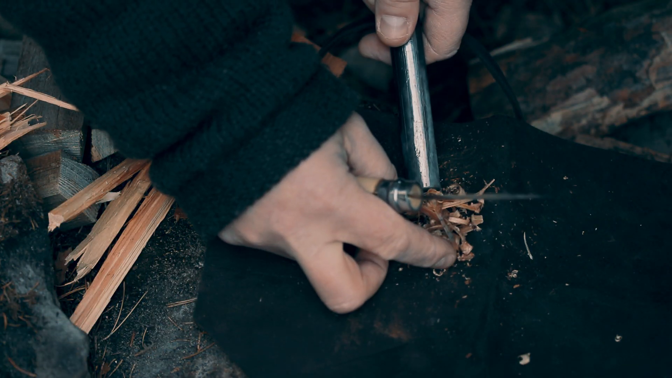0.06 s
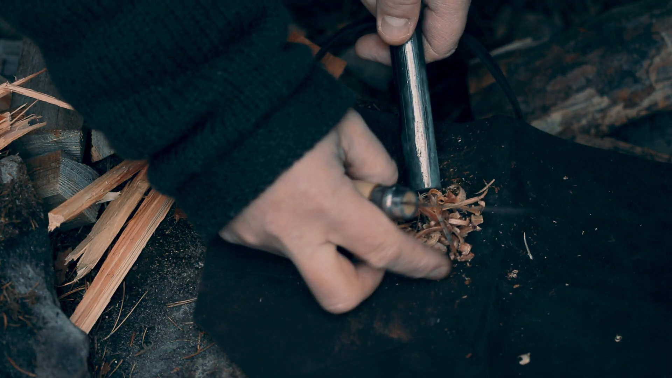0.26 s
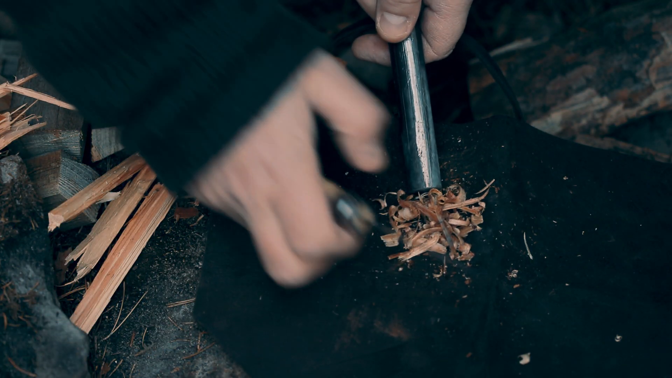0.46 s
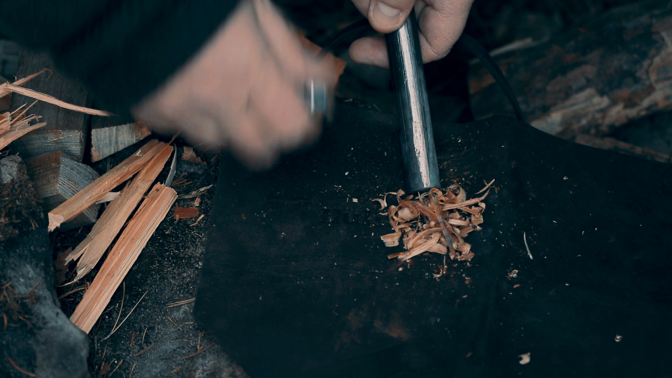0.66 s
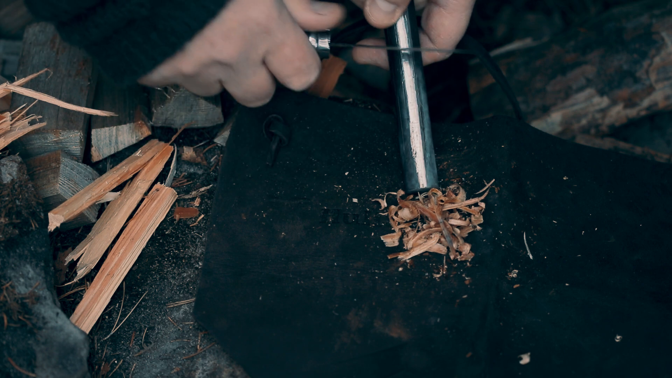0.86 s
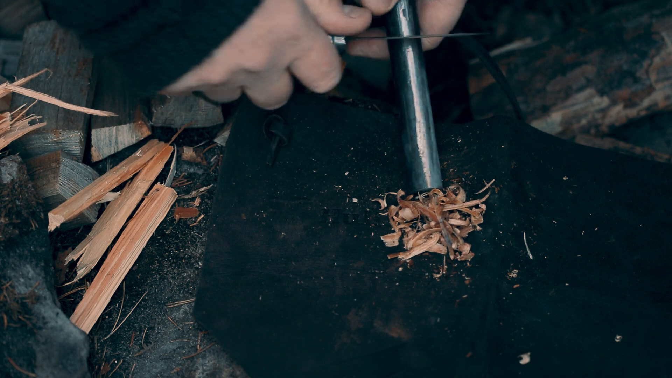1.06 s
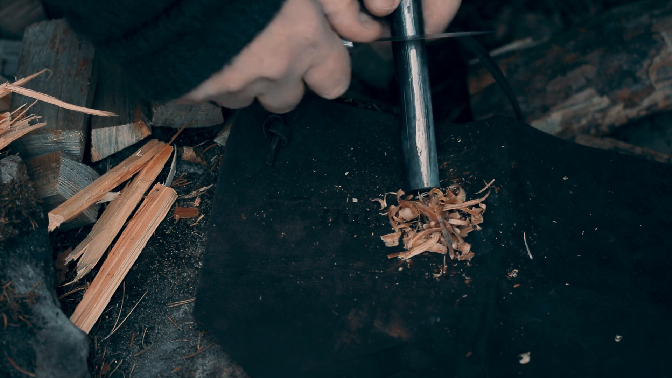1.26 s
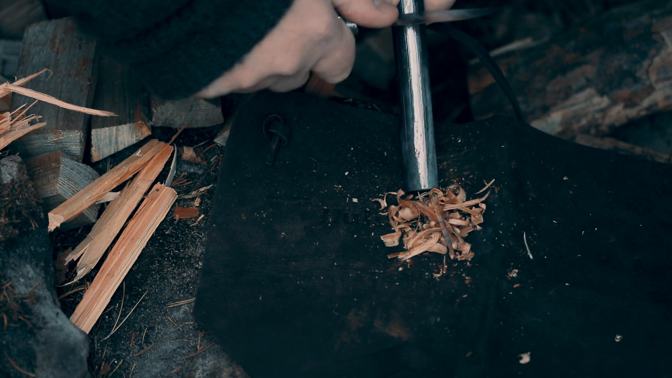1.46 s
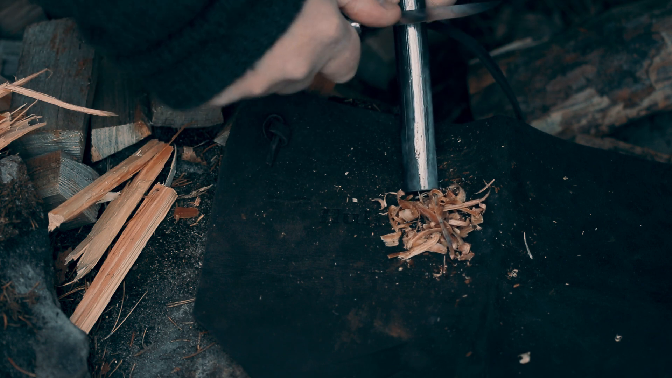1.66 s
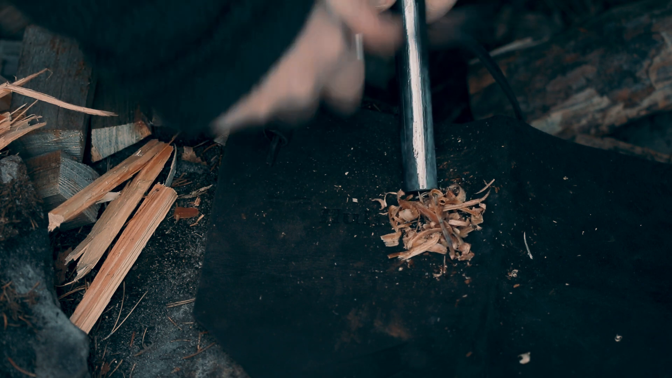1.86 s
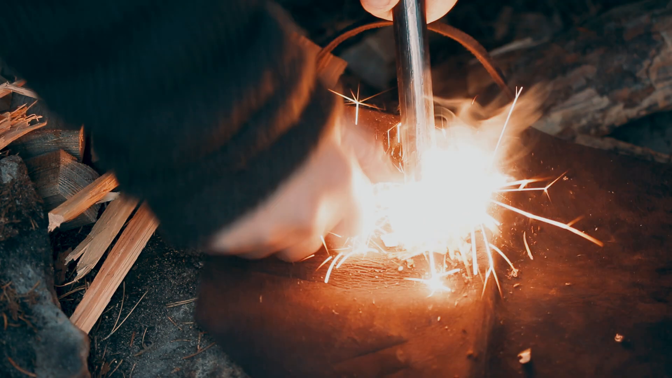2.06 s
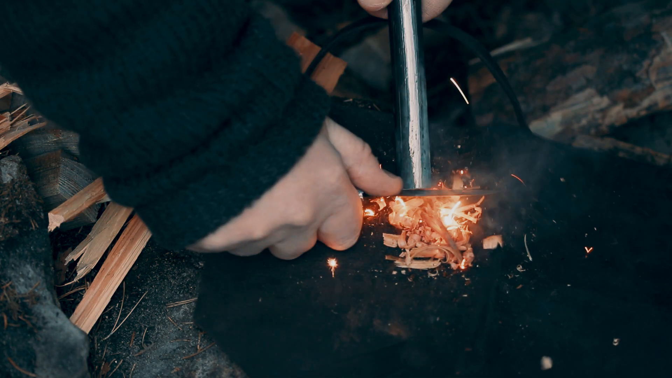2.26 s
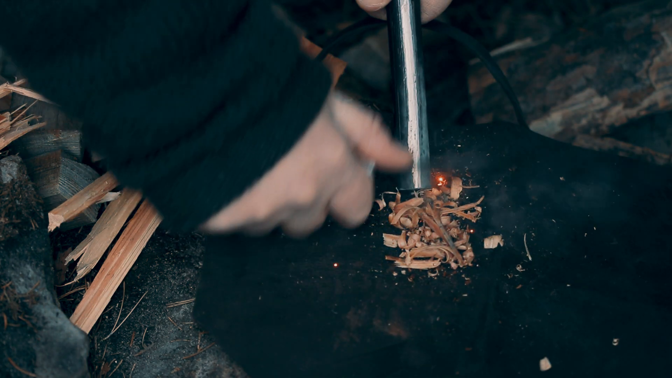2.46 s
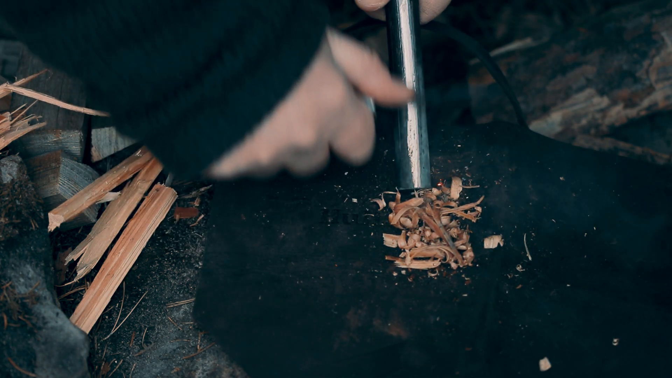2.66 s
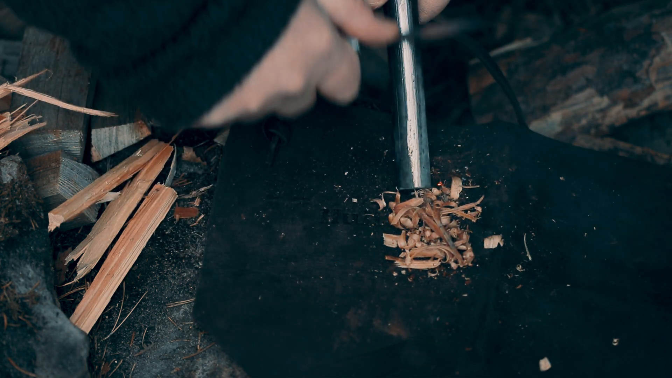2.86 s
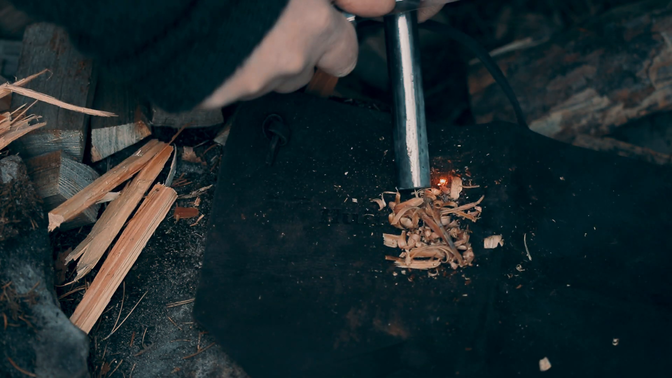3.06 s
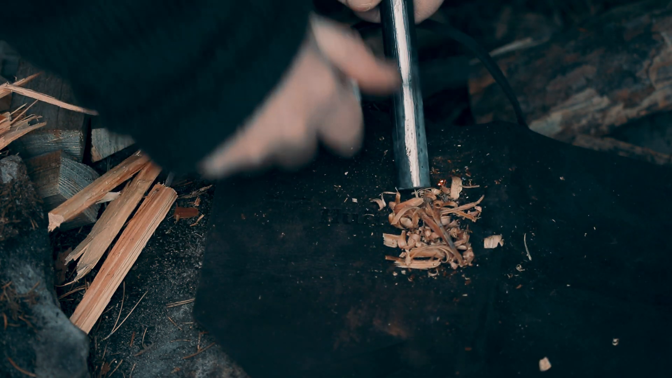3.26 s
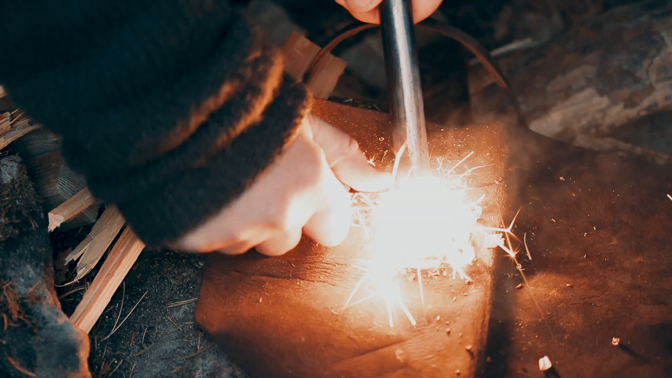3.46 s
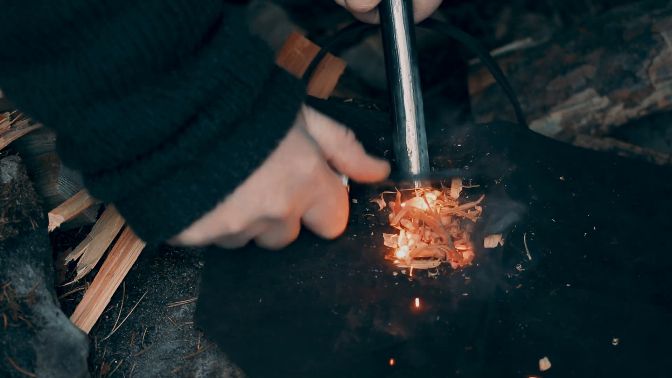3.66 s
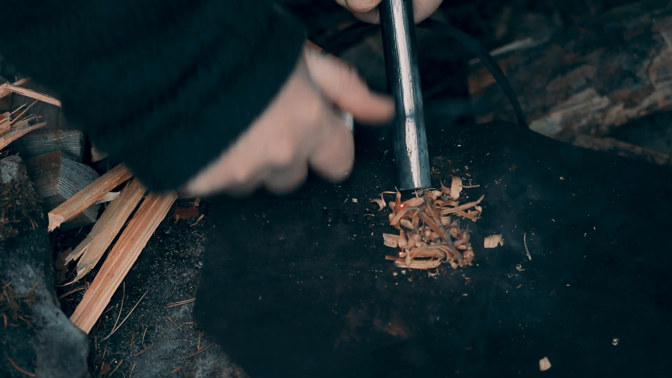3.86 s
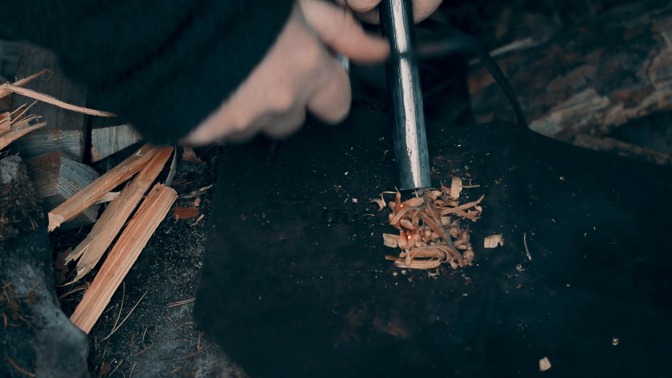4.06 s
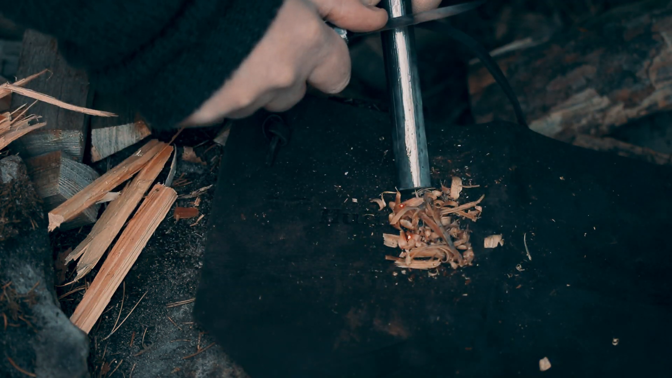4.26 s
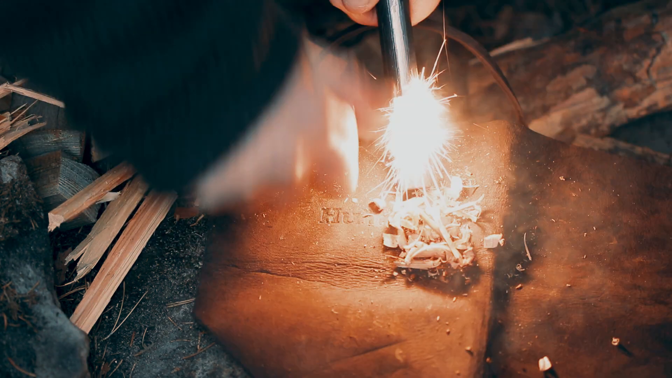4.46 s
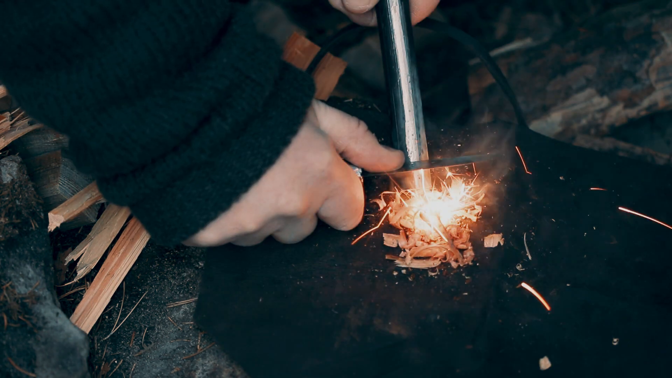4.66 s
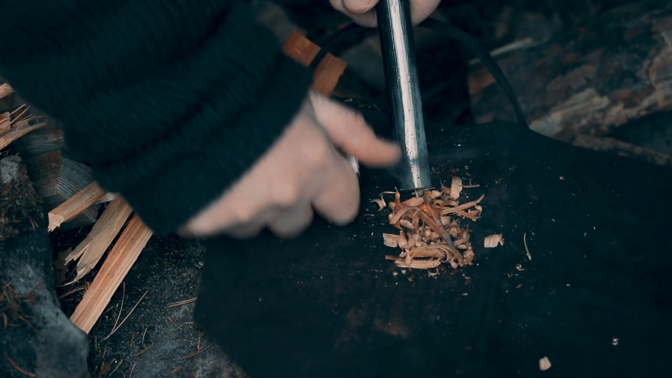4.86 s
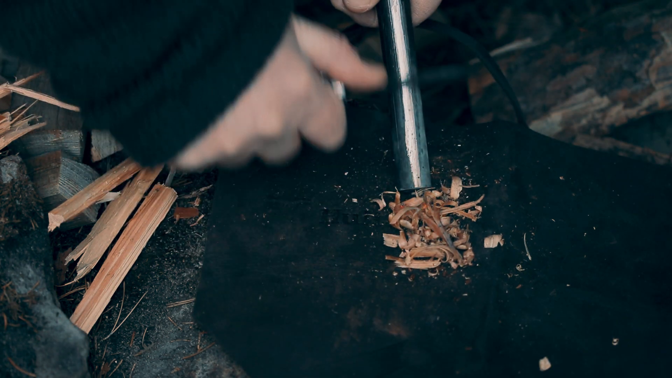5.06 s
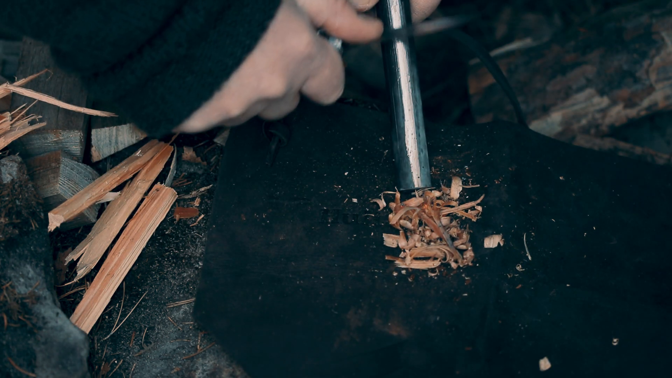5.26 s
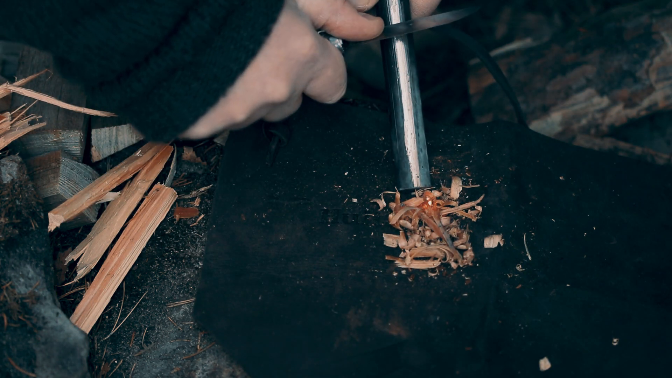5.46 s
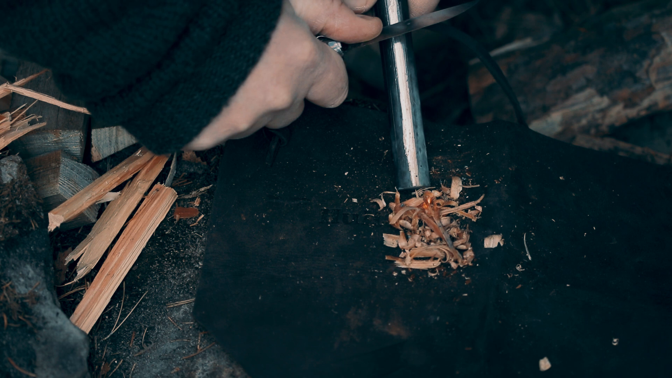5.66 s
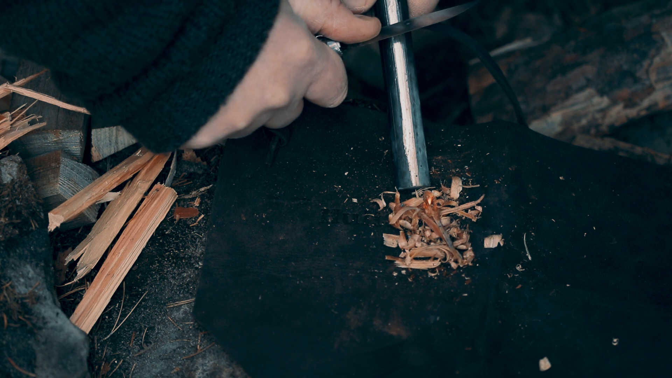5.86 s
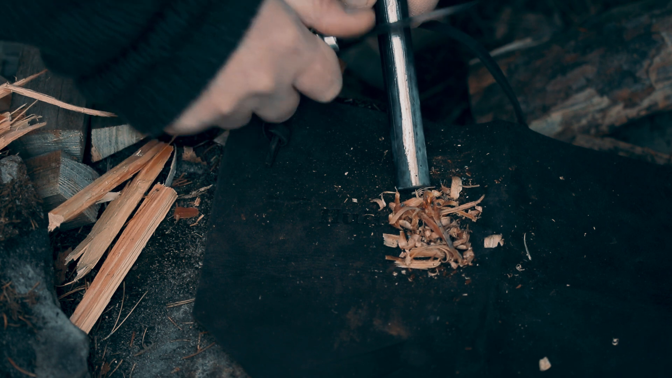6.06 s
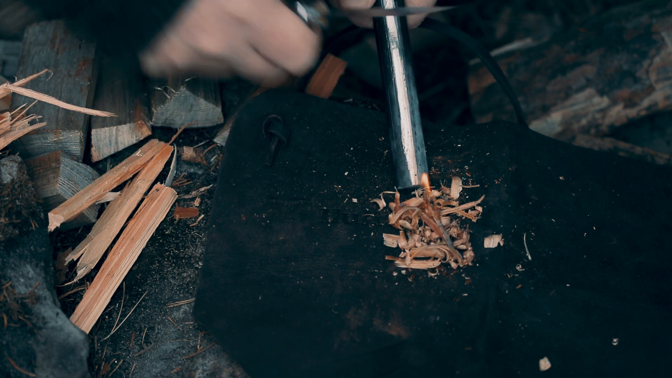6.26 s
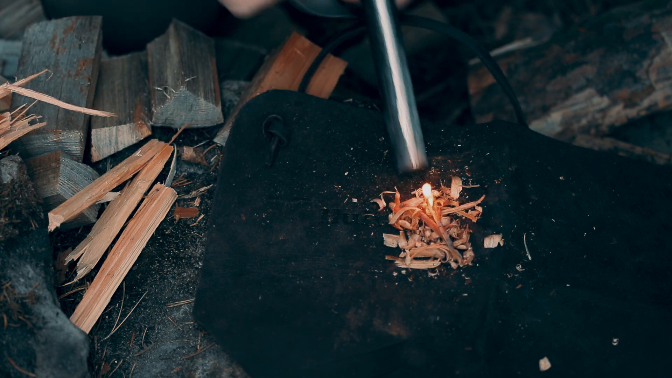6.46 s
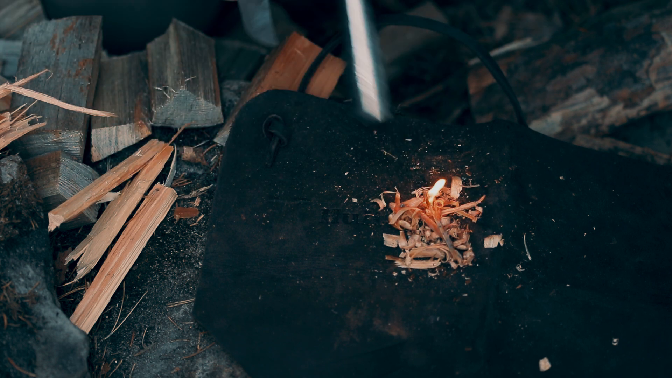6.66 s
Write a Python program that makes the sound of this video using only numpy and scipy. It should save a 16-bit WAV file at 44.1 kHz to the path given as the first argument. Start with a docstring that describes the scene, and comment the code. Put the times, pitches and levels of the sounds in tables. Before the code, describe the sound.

Close, dry outdoor sound of a striker on a fire-starting rod. Soft woollen sleeve rustle and a light tap come first, then a short thin squeak. Three gritty, bright scrapes follow, each swelling into a hissing tear with crackling sparks; the first ends in a hard steel knock. Chattering squeaks follow the second and third strokes, then near-quiet rustling and a few faint scratches over still air.

```python
"""A steel striker is dragged down a thick ferro rod three times over wood shavings at a quiet camp.
The edge grinds: random grains of noise hiss, ring rod and blade, and grind into the ground.
It squeaks (wavering tones and overtones) as it slides back up, and taps the rod (short fading tones).
Sparks and shavings snap in bursts of grains; woollen sleeves rustle as filtered noise over still air."""
import sys
import numpy as np
from scipy import signal
from scipy.fft import rfft, irfft, next_fast_len
from scipy.io import wavfile
from scipy.ndimage import uniform_filter1d

SR = 44100
rng = np.random.default_rng(int(sys.argv[2]) if len(sys.argv) > 2 else 0)


def dump(signal):
    """Clip the signal to [-1, 1] and save it as 16-bit WAV at the path in sys.argv[1]."""
    limited = np.clip(np.atleast_2d(signal).T, -1, 1)
    pcm = np.round(limited * 32767).astype(np.int16)
    wavfile.write(sys.argv[1], SR, pcm)


N = 296101  # length in samples

# tone of the grinding into the ground: f/Hz, relative level per Hz/dB
GRIND = [(70, -30), (130, -21.5), (330, -11.5), (520, -6.5), (700, -2.5), (900, 2), (1080, -7.5),
         (1250, -10), (1600, -13.5), (2500, -84)]
# tone of sparks and sharp cracks: f/Hz, relative level per Hz/dB
SPARK = [(710, -29), (1200, -35), (1770, 1), (3300, 0), (3600, 6.5), (5130, -4.5), (5650, 1.5),
         (8880, -4.5), (15700, -28)]
SPLIT_HZ = 6000  # rasp below, fizz above
DUG_IN = 0.088  # power share that rings the rod once the edge has dug in, 0-1
SLIDE_SHARE = 0.61  # the same share under a light touch, 0-1


def amp(db):
    """Turns decibels into a plain multiplier."""
    return 10 ** (np.asarray(db) / 20)


def evened(x):
    """Scales a sound to an average strength (rms) of 1."""
    return x / np.sqrt(np.mean(x ** 2) + 1e-20)


def colour(x, points):
    """Filters by a spectrum joined on a log-frequency axis, to rms 1."""
    f, db = np.transpose(points)
    size = next_fast_len(len(x))
    hz = np.fft.rfftfreq(size, 1 / SR)
    gain = amp(np.interp(np.log(hz + 1), np.log(f + 1), db, -90, -90))
    return evened(irfft(rfft(x, size) * gain, size)[:len(x)])


def add(mix, s, sound):
    """Adds a sound into the mix from time s on, cut off at the end of the mix."""
    part = mix[round(s * SR):][:len(sound)]
    part += sound[:len(part)]


def resonate(x, hz, width):
    """Shifts the curve hz down to zero, smooths, and shifts back: a resonance of gain 1."""
    turn = np.exp(2j * np.pi * np.cumsum(hz * np.ones(len(x))) / SR)
    r = np.exp(-np.pi * width / SR)
    return 2 * (turn * signal.lfilter([1 - r], [1, -r], x / turn)).real


def wander(count, per_s):
    """Smooth chance of rms 1 that changes about per_s times a second."""
    span = max(round(SR / per_s), 1)
    noise = rng.standard_normal(count + 4 * span)
    smooth = uniform_filter1d(uniform_filter1d(noise, span), span)
    return evened(smooth[2 * span:][:count])


def grains(count, per_s, spread_db):
    """Random tiny impacts over a bed of noise; a few are large."""
    size = amp(spread_db * np.minimum(rng.exponential(1, count), 5)) * rng.standard_normal(count)
    hits = size * (rng.random(count) < per_s / SR)
    return evened(hits + 0.26 * rng.standard_normal(count))


def halves(x):
    """Parts below and above SPLIT_HZ, each of rms 1."""
    low = signal.oaconvolve(x, signal.firwin(31, SPLIT_HZ, fs=SR), "same")
    return evened(low), evened(x - low)


def patchy(x, patch_db):
    """Random clumps in time and pitch: each grain has its own tone."""
    z = signal.stft(x, nperseg=128)[2]
    across_pitch = uniform_filter1d(rng.standard_normal(z.shape), size=2, axis=0)
    clumps = evened(uniform_filter1d(across_pitch, size=7, axis=1))
    return evened(signal.istft(z * amp(patch_db * clumps), nperseg=128)[1][:len(x)])


def columns(rows, lap=0.002):
    """Curves at the sample rate, with a soft start and a short soft overhang at the end."""
    s, *values = np.transpose(rows)
    t = np.arange(s[0], s[-1] + lap, 1 / SR)
    fade = np.sqrt(np.clip(np.minimum(t - s[0], t[-1] - t) / lap, 0, 1))
    curves = [uniform_filter1d(np.interp(t, s, v), size=90, mode="nearest") for v in values]
    return s[0], fade, curves


def air():
    """Still outdoor air: filtered noise, drifting a little."""
    # tone of the air: f/Hz, relative level per Hz/dB
    air_tone = [(12, -52.5), (20, -15), (65, -13.5), (130, -11.5), (186, -12), (233, -8.5), (407, -3.5),
                (618, -6.5), (993, -8), (1640, -21), (8270, -22.5), (12200, -22), (15700, -23.5)]
    level_db = -71.5 + 0.99 * wander(N, 7.1)
    return amp(level_db) * colour(rng.standard_normal(N), air_tone)


def sleeves():
    """Wool fibres rub as the arms move: many small grains that swell and sink."""
    # how strongly the sleeves rub, before a small random waver: t/s, level/dB
    rubbing = [(0.0, -76.5), (0.358, -74), (0.48, -67), (0.64, -63), (0.84, -69), (1.338, -67),
               (1.476, -72.5), (1.714, -67), (4.06, -65), (4.36, -71.5), (5.122, -63), (5.24, -68),
               (5.776, -77), (6.05, -72), (6.296, -68), (6.426, -66), (6.71, -65)]
    # tone of the wool: f/Hz, relative level per Hz/dB
    wool = [(530, -36), (900, -5.5), (1120, -9), (1350, -3.5), (1490, -6.5), (1740, -4.5), (2130, -6.5),
            (7480, -8), (15700, -28.5)]
    s, db = np.transpose(rubbing)
    level_db = np.interp(np.arange(N) / SR, s, db) + 1.0 * wander(N, 37.4)
    return amp(level_db) * colour(grains(N, 5000, 0.54), wool)


def snap(s, db, hz, bass_db, treble_db, t60):
    """A spark or shaving snaps: a burst of grains, partly tuned, with a dull push under it."""
    t = np.arange(SR // 8) / SR
    grit = grains(len(t), 4000, 2.5)
    grit[12] += 4.0  # a strong early break
    rasp, fizz = halves(colour(grit, SPARK))
    tuned = evened(resonate(grit, hz, 180))
    crack = 0.1 * rasp + 0.5 * amp(treble_db) * fizz + 0.14 * tuned
    push = 0.5 * amp(bass_db) * colour(grit, GRIND)
    fall = amp(db - 60 * t / max(t60, 0.002))
    return s, fall * np.minimum(t / 0.00042, 1) * (crack + push)


def tap(s, db, tune, damp, crack_db, thud_db, thud_hz):
    """Steel meets rod: a crack, the short ring of the steel, and a thud where the rod stands."""
    # tones of the steel at tuning and damping factor 1: f/Hz, relative level/dB, time to fade 60 dB/s
    steel = [(1530, -5.5, 0.043), (3030, -8.5, 0.027), (3550, -7, 0.044), (4100, -28, .02),
             (5120, -1, 0.014), (6410, -7.5, 0.035)]
    t = np.arange(SR // 8) / SR
    ring = sum(amp(d - 60 * damp * t / t60) * np.sin(2 * np.pi * hz * tune * t) for hz, d, t60 in steel)
    crack = colour(rng.standard_normal(len(t)), SPARK) * amp(crack_db - 60 * t / 0.028)
    thud = amp(thud_db - 60 * t / 0.059) * np.sin(2 * np.pi * thud_hz * t) * np.minimum(t / 0.007, 1)
    return s, amp(db) * ((0.78 * ring + crack) * np.minimum(t / 0.00066, 1) + thud)


def slips(rows, stall_s):
    """Partial levels of a squeak, which throbs once the edge starts to stall."""
    clean, stalled, stalling_s = 0.07, 0.77, 0.03  # throb depths 0-1, and the time between them in s
    return [(s, hz, db, *(db + np.array(rel)), np.interp(s - stall_s, [0, stalling_s], [clean, stalled]))
            for s, hz, db, *rel in rows]


def squeak(rows):
    """Stick and slip locks to the blade; it stalls in throbs, and strong-weak slips add rough half partials."""
    # overtones above the second: multiple of the slip rate, level against the third partial/dB
    overtones = [(3, -0.5), (4, -11), (5, -16.5)]
    # rough tones between the partials: multiple of the slip rate, relative level/dB
    half_tones = [(.5, -16), (1.5, -16), (2.5, 1.5), (3.5, -12.5)]
    s, fade, (hz, first_db, second_db, third_db, half_db, flutter) = columns(rows, lap=0.0013)
    n = len(fade)
    flutter = np.clip(flutter, 0, 1)
    shaky_hz = hz * (1 + (0.0044 + 0.0076 * flutter) * wander(n, 370))
    turn = 2 * np.pi * np.cumsum(shaky_hz) / SR
    throb_hz = 125 * (1 + 0.263 * wander(n, 65.7))
    throb = 1 - flutter * np.cos(np.pi * np.cumsum(throb_hz) / SR) ** 2
    first = amp(first_db) * np.sin(turn)
    upper = amp(second_db) * np.cos(2 * turn)
    for k, db in overtones:
        upper = upper + amp(third_db + db + 1.4 * (k - 1.5) * wander(n, 260)) * np.cos(k * turn)
    half = sum(amp(db) * wander(n, 850) * np.cos(k * turn) for k, db in half_tones)
    return s, fade * np.sqrt(2) * (first * throb + upper * throb ** 2 + amp(half_db) * half)


def under(rows):
    """The scrape that goes with a squeak follows the level of its first partial."""
    # levels against the first partial: rasp/dB, fizz/dB, blade ring/dB, grind/dB
    drag_mix = (-20, -29, -14.5, -39)
    return [(s, *(db + np.array(drag_mix)), 0.97, SLIDE_SHARE) for s, hz, db, *rel in rows]


def slide(rows, tune, grind_db):
    """A light drag: the fizz follows the rasp, the grind follows the blade."""
    fizz_db = -12  # against the rasp
    return [(s, db + rel, db + rel + fizz_db, db, db + grind_db, tune, SLIDE_SHARE) for s, db, rel in rows]


def skip(s, db, fizz_db, rise, fall):
    """The edge skips after a stroke: one short bite, up to a peak, then away."""
    # levels against the rasp: blade ring/dB, grind/dB
    skip_mix = (-4.5, -5.5)
    rise_db, fall_db, tune = -14, -25.5, 0.916  # ends against the peak in dB, blade tuning factor
    shape = [(s - rise, db + rise_db), (s, db), (s + fall, db + fall_db)]
    return [(t, d, d + fizz_db, *(d + np.array(skip_mix)), tune, DUG_IN) for t, d in shape]


def stroke(rows, dig_s, tune):
    """The edge skims and rings the rod, then digs in and tears it."""
    skimming, digging_s = 0.96, 0.027  # power share that rings the rod 0-1, time to dig in in s
    return [(s, db, *(db + np.array(rel)), tune, np.interp(s - dig_s, [0, digging_s], [skimming, DUG_IN]))
            for s, db, *rel in rows]


def scrape(rows, hiss, modes, chatter_db, patch_db, ring_hz, ring_width):
    """The edge tears grains off the rod; they hiss, ring rod and blade, and grind into the ground."""
    s, fade, (rasp_db, fizz_db, blade_db, grind_db, tune, share) = columns(rows)
    n = len(fade)
    bite = amp(chatter_db * wander(n, 183))  # the edge catches unevenly
    grit = grains(n, 12000, 2.8) * bite
    drift = 1 + 0.016 * wander(n, 13.7)  # the damping edge shifts the modes as it travels
    rod = np.zeros(n)
    for hz, width, db in modes:
        ring = evened(resonate(resonate(grit, hz * drift, width), hz, 4.0 * width))
        rod += amp(db + 2.5 * wander(n, 39.6)) * ring
    share = np.clip(share, 0, 1)
    torn = halves(patchy(colour(grit, hiss), patch_db))
    rasp, fizz = (np.sqrt(1 - share) * a + np.sqrt(share) * b for a, b in zip(torn, halves(rod)))
    blade_hz = ring_hz * tune
    blade = evened(resonate(resonate(grit, blade_hz, ring_width), blade_hz, 3 * ring_width))
    grind = colour(grains(n, 1500, 2.5) * bite, GRIND)
    sound = amp(rasp_db) * rasp + amp(fizz_db) * fizz + amp(blade_db) * blade + amp(grind_db) * grind
    return s, fade * sound


def scene():
    """Lays strokes, skips, light drags, squeaks, taps and snaps over the sleeves, then adds the air."""
    # sparks and shavings snap: t/s, level/dB, centre f/Hz, bass/dB, treble/dB, time to fade 60 dB/s
    snap_rows = [(1.4594, -34, 1860, -46, -21, .05), (1.4794, -34.5, 1820, -46, -16, 0.051),
                 (2.2274, -47, 2740, -20, -13, 0.027), (2.2628, -29.5, 2750, -10, -25, 0.037),
                 (2.2844, -28, 1860, -7, -21, 0.015), (2.3002, -39, 3720, -5, -22, .049),
                 (2.3486, -34, 2760, -15, -20, .024), (2.3665, -29.5, 8800, -19, -24, 0.031),
                 (2.4009, -29.5, 2810, -22, -32.5, 0.039), (2.4164, -38, 2230, -12, -28, 0.054),
                 (2.4644, -40.5, 2850, -4, -21, .023), (2.4823, -41, 1640, -6, -9, .02),
                 (2.5122, -29, 1540, -21, -39, .02), (2.5386, -46, 1550, -21, -31, 0.049),
                 (2.6587, -45, 1960, -15, -9, 0.023), (2.6968, -33, 5700, -20, -24, 0.03),
                 (2.7686, -42, 6030, -28, -26, 0.056), (3.0754, -48, 1950, -18, -22, .03),
                 (3.2005, -35, 4540, -8.5, -7, 0.024), (3.4251, -28, 8110, -15, -9, 0.037),
                 (3.463, -24, 3940, -21, -10, 0.053), (3.482, -30.5, 8300, -7, -15, .03),
                 (3.5414, -26, 2750, -14, -26, 0.077), (3.5763, -25, 2390, -13.5, -18, 0.11),
                 (3.6644, -36, 3080, -9.5, -8, 0.031), (3.7254, -37.5, 2000, -17, -19, 0.074),
                 (3.7918, -32, 2600, -37, -32, 0.099), (3.8294, -26.5, 1970, -32, -18, 0.069),
                 (3.9344, -21.5, 1750, -33, -37, 0.044), (4.2028, -39, 1930, -19, -19, .03),
                 (4.2283, -26, 1900, -20.5, -5, 0.013), (4.6249, -36, 1830, -22, -16, .03),
                 (4.6738, -23, 1760, -27, -19, 0.026), (4.7451, -26, 5650, -16, -20, 0.019),
                 (4.7805, -44, 3470, -13, -19, .05), (4.8044, -35.5, 5670, -16, -15, 0.015),
                 (4.8244, -39, 6500, -25, -13, 0.056), (4.9691, -31, 1830, -34, -22, .022),
                 (5.0462, -42, 1930, -22, -21, .03), (5.1118, -37, 3450, -19, -27, 0.058),
                 (6.5665, -35, 1540, -28, -23, 0.019), (6.5774, -40, 1390, -6, -25, .03),
                 (6.6134, -41, 1500, -8, -25, .025)]
    # steel meets rod: t/s, level/dB, tuning factor, damping factor, crack/dB, thud/dB, thud f/Hz
    # (crack and thud are against the level)
    tap_rows = [(.532, -48, .9, .8, -10, -8, 400), (1.0715, -32, 1.0, 1.0, -10, -40, 400),
                (2.1619, -15, .83, 1.9, -22, -30, 140), (2.1641, -19, .95, 1.6, -22, -26, 230)]
    # one list a squeak: t/s, slip rate f/Hz, first partial level/dB;
    # against it: second partial/dB, third partial/dB, half partials/dB
    squeak_lists = [
        [(1.208, 1830, -75, -10, -20, -5), (1.219, 1860, -59.5, -6, -18, -13), (1.23, 1900, -72, -15, -20, -6)],
        [(1.398, 2000, -71, -25, -28, -29), (1.406, 1905, -39, -7, -11, -21), (1.426, 1920, -50, -15, -33, -29),
         (1.446, 1990, -41, -3.5, -17, -29), (1.464, 1936, -40.5, -3, -15, -13.5),
         (1.482, 1912, -36.5, -10, -15, -22), (1.492, 2010, -57, -4, -13, -13),
         (1.512, 1860, -60, -13, -19, -14), (1.53, 1830, -65, -20, -25, -20)],
        [(4.165, 1870, -59, -9, -18, -11), (4.181, 1852, -55, -3, -22, -10), (4.195, 1937, -61, -14, -18, -18),
         (4.213, 1869, -62, -19, -18, -23), (4.221, 1922, -47, -1, -23, -17), (4.235, 1982, -54, -4, -12, -6),
         (4.258, 1866, -48.5, -23, -19, -18), (4.285, 1850, -72, -12, -15, -8)],
        [(4.935, 2054, -77, -13, -25, -10), (4.942, 2094, -51.5, -7, -29, -19),
         (4.954, 2048, -43.5, -6, -34, -20), (4.961, 1880, -31, -9, -7, -27), (4.967, 1917, -47.5, -6, -8, 2.5),
         (4.972, 1876, -33.5, -11, -11, -11), (4.998, 1876, -37.5, -8.5, -28, -13),
         (5.02, 1937, -49, -16, -25, -18), (5.04, 1910, -60, -18, -25, -16), (5.05, 1926, -50, -18, -25, -24),
         (5.085, 1900, -64, -18, -25, -20)],
        [(3.838, 2060, -40, -1, -14, -20), (3.846, 1878, -30.5, -6, -9.5, -16),
         (3.886, 1858, -33, 4.5, -8.5, -13.5), (3.9, 1883, -34.5, 3.5, -8.5, -20),
         (3.942, 1895, -39, -1, -20, -15), (3.956, 1908, -45.5, 4, -16, -25), (3.978, 1833, -60, -9, -10, -13),
         (3.988, 1910, -48.5, 3, -16, -28), (4.0, 1786, -53, 3, -14, -10), (4.02, 1961, -58.5, 0, -15, -19),
         (4.035, 1800, -62, -7, -9, -13)],
    ]
    # when each squeak starts to throb: t/s
    stall_times = [1.3, 1.49, 4.12, 4.985, 3.89]
    # one list a light drag of the edge: t/s, blade ring level/dB, rasp against it/dB
    slide_lists = [
        [(0.0, -75, 2), (0.006, -78.5, -17), (0.062, -66, -11), (0.124, -72, -10), (0.14, -90, 0)],
        [(2.505, -67, -12), (2.511, -52, -8), (2.553, -49.5, -3), (2.569, -69, -13), (2.6, -65, -4)],
        [(2.6, -63, -5), (2.7, -80, 8), (2.774, -74, 8), (2.824, -81, -2), (2.85, -67, -8), (2.95, -69.5, -6),
         (2.975, -63.5, -9.5), (3.02, -68, -10), (3.074, -61, -22), (3.095, -93.5, 0)],
        [(5.01, -57, -13), (5.07, -60, -5), (5.09, -62, -1), (5.122, -63, 5), (5.15, -65, -7), (5.192, -64, -1),
         (5.26, -62, -7), (5.28, -76, -15), (5.31, -65, -16), (5.37, -71, -16), (5.39, -91, -6)],
        [(6.49, -78, -2), (6.52, -66, -14), (6.56, -59.5, -15), (6.575, -58, -19), (6.6, -61, -19),
         (6.616, -55, -18), (6.63, -62, -7), (6.67, -64, -13), (6.71, -80, -10)],
    ]
    # per light drag: blade tuning factor, grind against the blade/dB
    touches = [(0.68, 0), (0.89, -11.5), (0.86, -12), (0.9, -8.5), (.79, -10)]
    # skips after a stroke: peak t/s, rasp level/dB, fizz against it/dB, rise/s, fall/s
    skip_rows = [(2.262, -45.5, -6.5, .016, 0.069), (2.301, -52.5, -3.5, .012, .07),
                 (2.412, -46.5, -4.5, .014, .08), (3.79, -54.5, -14, .03, 0.17),
                 (4.712, -51, -3.5, .012, .12), (4.744, -51.5, -12.5, .006, .05),
                 (4.784, -49.5, -4, .014, 0.023)]
    # one list a stroke down the rod: t/s, pressure as rasp level/dB;
    # against it: fizz/dB, blade ring/dB, grind/dB
    stroke_lists = [
        [(1.905, -86, -15, 2, 4), (1.917, -58, 3, 6, -10), (1.942, -51.5, 0, -1, -9.5),
         (1.992, -48.5, 5, -5, -11), (2.03, -42, 1, -2.5, -6), (2.1, -46, 4, -0.5, 0),
         (2.116, -45, -0.5, -1, -1), (2.152, -42.5, -5, -2, -1), (2.176, -46, -3.5, 0.5, 2),
         (2.2, -51.5, -5.5, -1, -3.5), (2.245, -61.5, -4, -6, -3)],
        [(3.194, -73, 2, -2, -8), (3.198, -58, 1, 0, -6), (3.262, -52, 2.5, -6.5, -15),
         (3.288, -54.5, -0.5, 3, -10), (3.354, -50, -1, -6, -16), (3.394, -44, 0.5, -8, -6),
         (3.432, -56.5, 0, 0, -4), (3.446, -67, -2, 1, 2), (3.462, -48, 0, -19, -16), (3.474, -49, 3, -19, -13),
         (3.486, -42.5, 5.5, -13, -12), (3.498, -41, 4.5, -2.5, -6.5), (3.512, -39.5, -4.5, -5, -3.5),
         (3.562, -44, -2.5, -5.5, -7.5), (3.584, -46.5, -3, -6, 2), (3.636, -49, -5.5, -4, -8.5),
         (3.67, -56, -5, -6, -1.5), (3.72, -67.5, -5, -4, -8)],
        [(4.372, -68.5, 0, 3, -6), (4.41, -55, 0.5, -3.5, -15), (4.482, -54.5, 0.5, -2.5, -13),
         (4.56, -39.5, -1, -7, -9), (4.582, -45, 3.5, 1, 2), (4.604, -47, -2.5, -1, -2.5),
         (4.616, -49, 0, -2, 1), (4.626, -49, -2, -1, -6.5), (4.65, -46.5, -2, -2, -3.5),
         (4.66, -49, -6, 1, -0.5), (4.676, -44.5, -1, -9, -10), (4.69, -54, 6, -1, 0.5),
         (4.71, -53, -6, -4, -7)],
    ]
    # per stroke: t/s when the edge starts to dig in, blade tuning factor
    digs = [(2.03, 0.94), (3.485, 0.94), (4.56, 0.96)]
    # torn grit in strokes and skips: f/Hz, relative level per Hz/dB
    grit_tone = [(1240, -46), (2100, 3.5), (2820, 5), (3880, 0.5), (4520, -2), (5910, -2.5), (8930, -3.5),
                 (14900, -20.5), (15700, -33)]
    # torn grit in light drags: f/Hz, relative level per Hz/dB
    drag_tone = [(1180, -41), (2000, 23), (3050, -15), (3330, -6), (3880, -2), (4500, 8.5), (6080, -9),
                 (9690, -39), (11600, -25), (14400, -30), (15700, -43)]
    # rod resonances under the cutting edge, before they drift: f/Hz, first filter's width/Hz, mean level/dB
    rod_modes = [(4100, 370, -2), (4540, 910, 11.5), (5440, 380, 3), (6530, 1800, 9.5), (8080, 510, 6),
                 (8850, 330, -2), (10360, 480, -6), (11600, 230, -14), (14500, 610, -9)]
    # rod resonances under a light touch, same columns: f/Hz, first filter's width/Hz, mean level/dB
    edge_modes = [(3530, 330, 5), (3920, 480, 3.5), (4470, 300, -16), (6040, 150, -14), (8500, 480, -1),
                  (10400, 330, -9), (13700, 270, -17)]

    near = sleeves()
    hard = [stroke(rows, *dig) for rows, dig in zip(stroke_lists, digs)] + [skip(*row) for row in skip_rows]
    for rows in hard:
        add(near, *scrape(rows, grit_tone, rod_modes, chatter_db=1.5, patch_db=3.0, ring_hz=1850, ring_width=344))
    light = [slide(rows, *touch) for rows, touch in zip(slide_lists, touches)]
    light += [under(rows) for rows in squeak_lists]
    for rows in light:
        add(near, *scrape(rows, drag_tone, edge_modes, chatter_db=4.0, patch_db=2.0, ring_hz=1814, ring_width=360))
    for rows, stall_s in zip(squeak_lists, stall_times):
        add(near, *squeak(slips(rows, stall_s)))
    for row in tap_rows:
        add(near, *tap(*row))
    for row in snap_rows:
        add(near, *snap(*row))
    # small things radiate no deep bass
    near = signal.sosfilt(signal.butter(4, 95, "high", fs=SR, output="sos"), near)
    return np.array([near, near]) + air()


def record(dry):
    """Adds a faint hiss, opposite in the two channels, then removes the highest treble."""
    # tone of the hiss: f/Hz, relative level per Hz/dB
    hiss_tone = [(12, -38), (20, 2), (65, -2.5), (208, -0.5), (283, -1), (385, -2), (418, -1), (553, -3.5),
                 (2230, -9), (6990, -5), (15700, -7.5)]
    hiss_db, top_hz = -78, 15800
    side = amp(hiss_db) * colour(rng.standard_normal(N), hiss_tone)
    both = dry + np.array([side, -side])
    low_pass = signal.firwin(511, top_hz, window=("kaiser", 9), fs=SR)
    return signal.oaconvolve(both, low_pass[None], "same")


dry = scene()
out = record(dry)
dump(out)
```